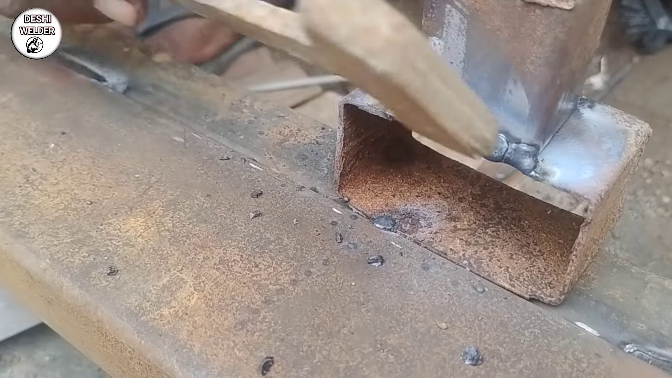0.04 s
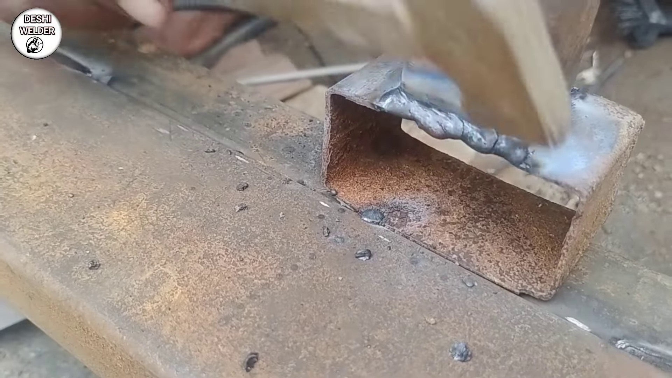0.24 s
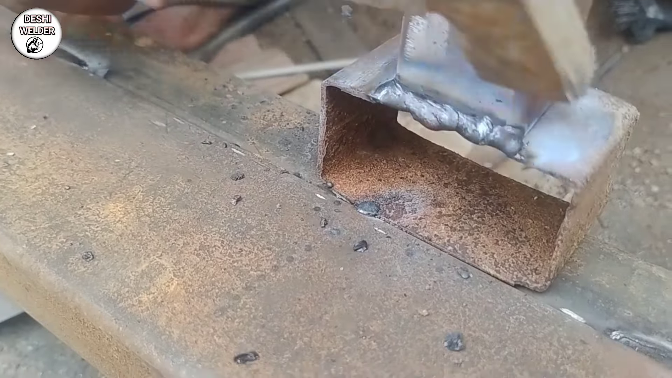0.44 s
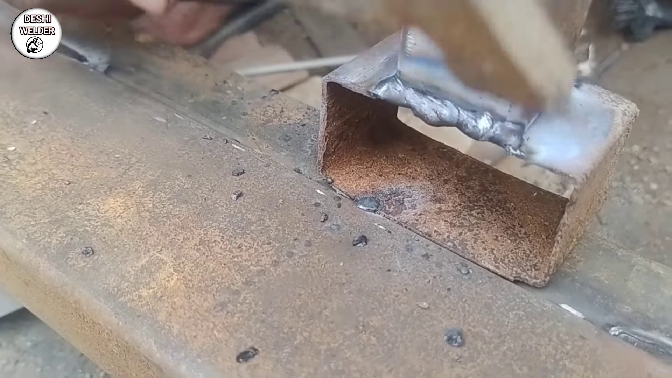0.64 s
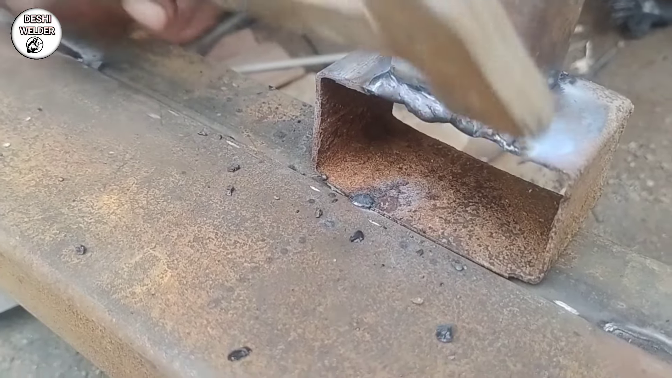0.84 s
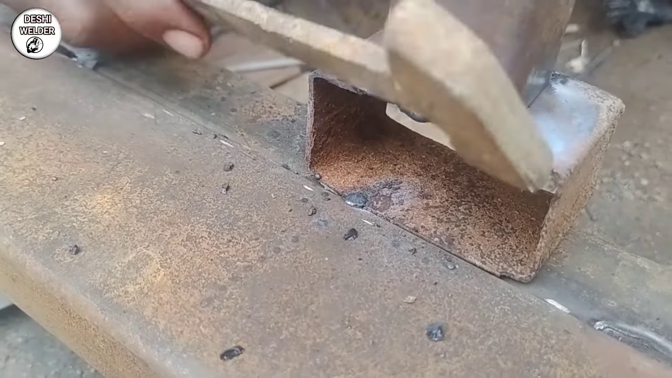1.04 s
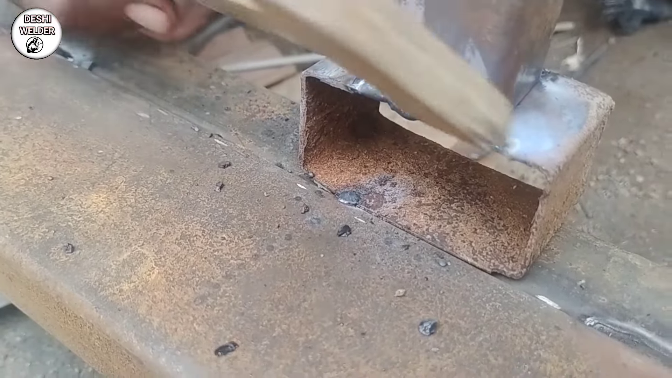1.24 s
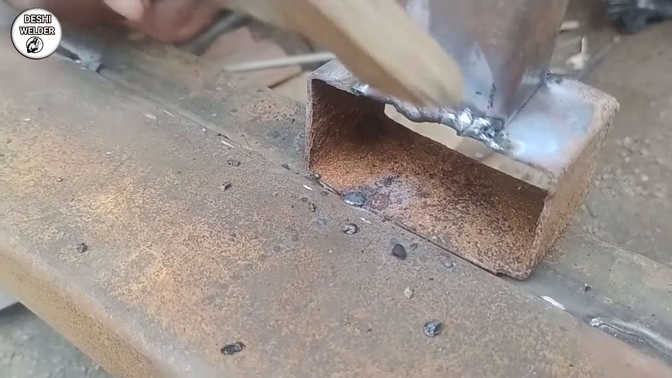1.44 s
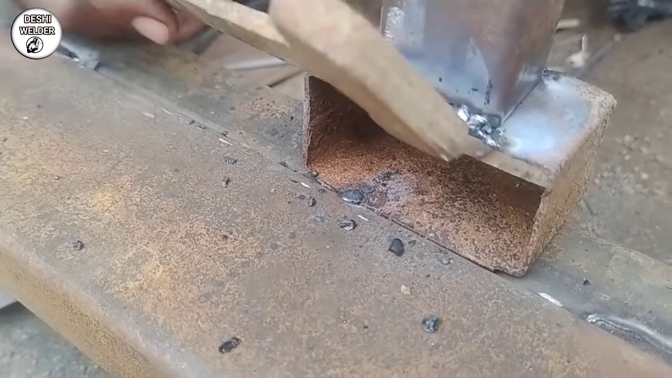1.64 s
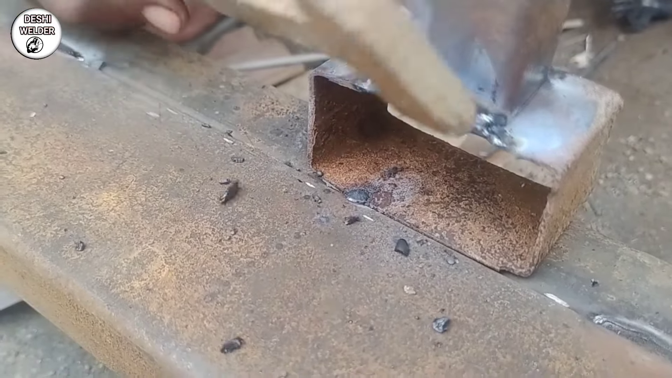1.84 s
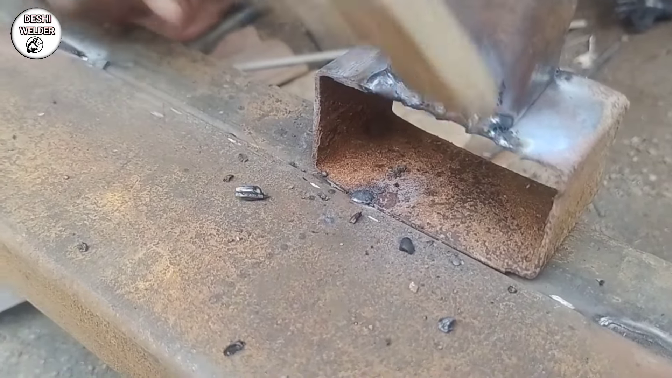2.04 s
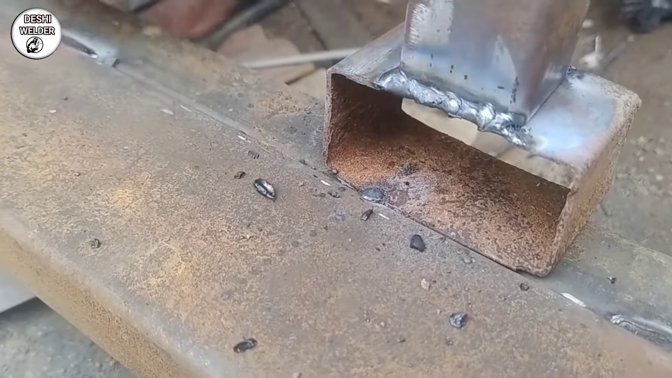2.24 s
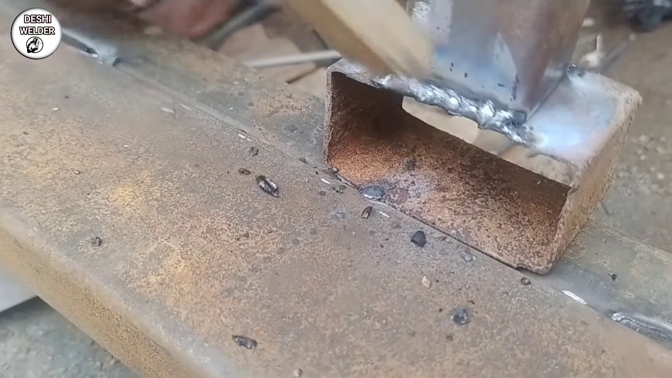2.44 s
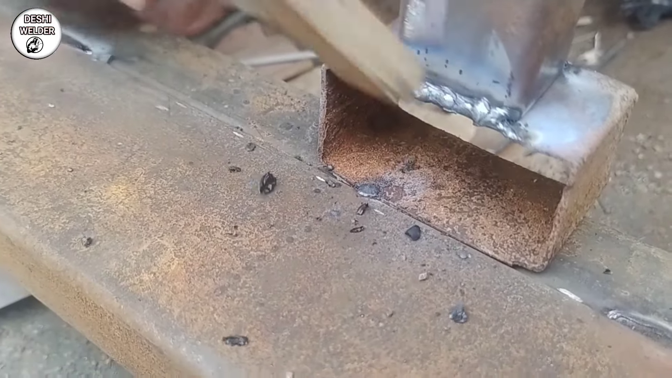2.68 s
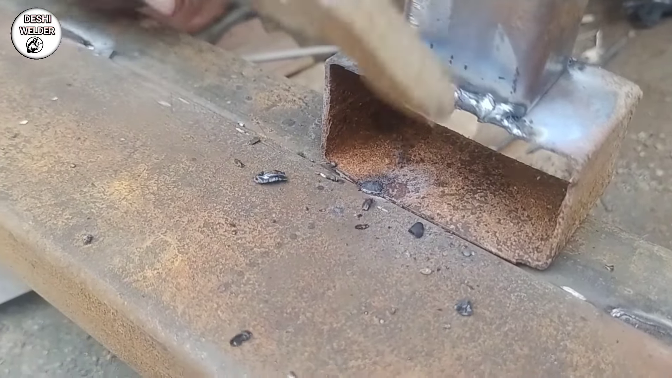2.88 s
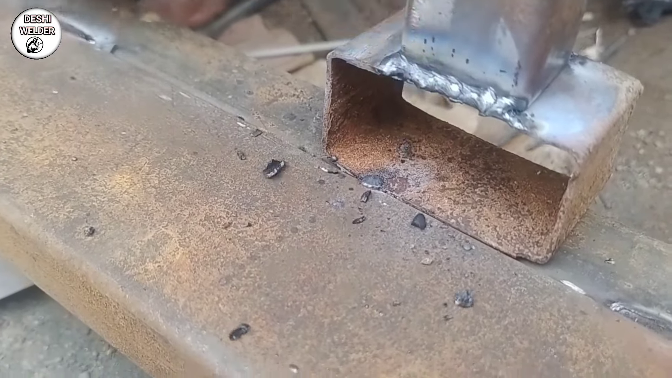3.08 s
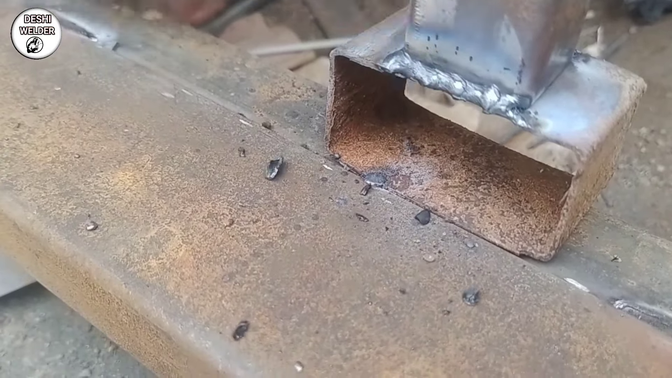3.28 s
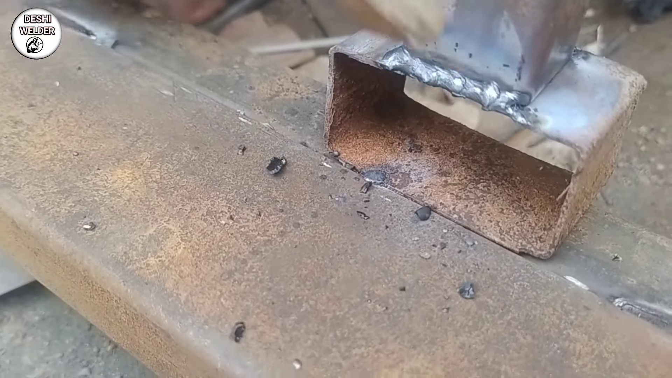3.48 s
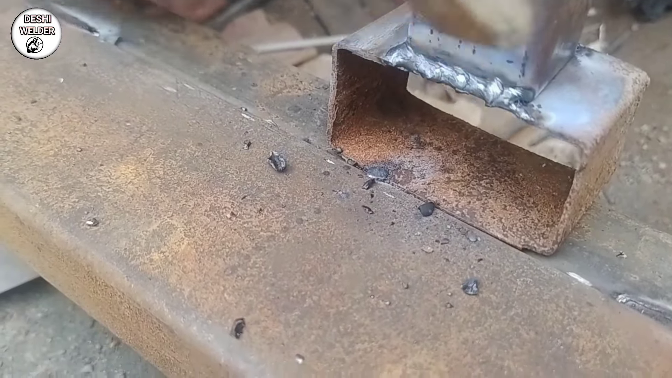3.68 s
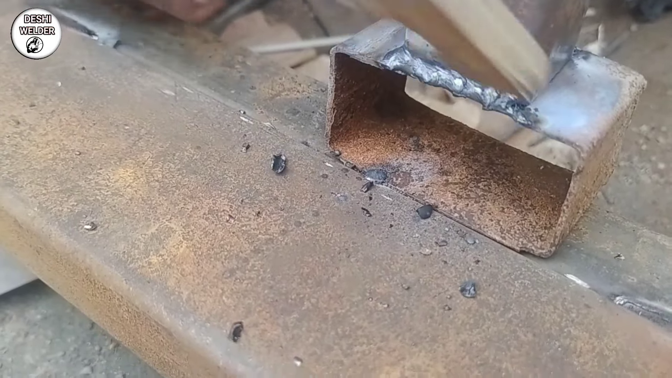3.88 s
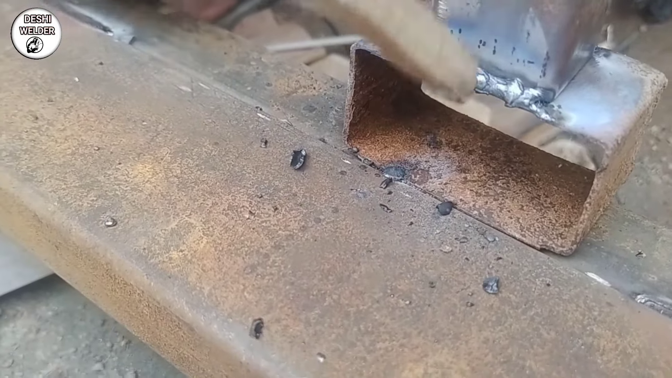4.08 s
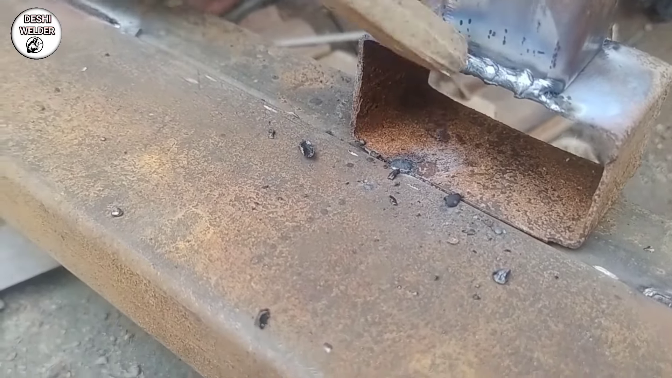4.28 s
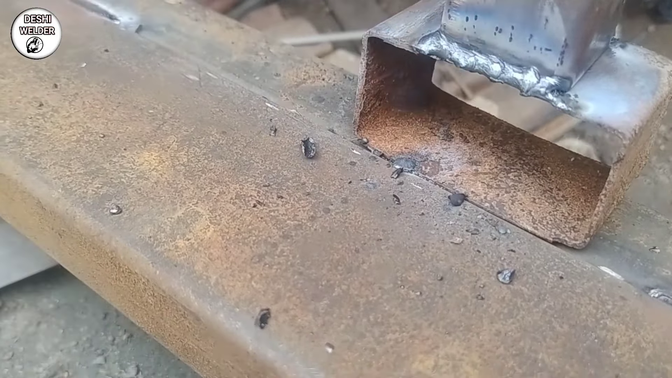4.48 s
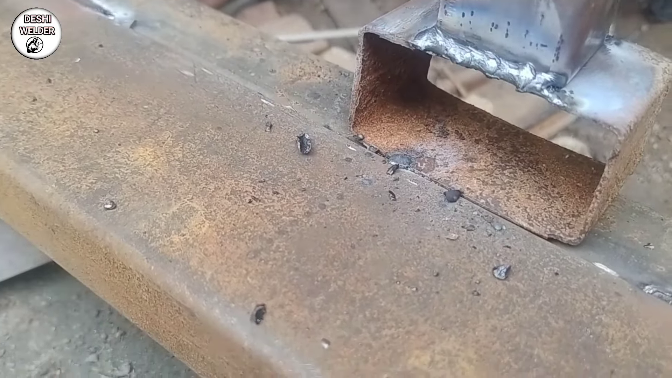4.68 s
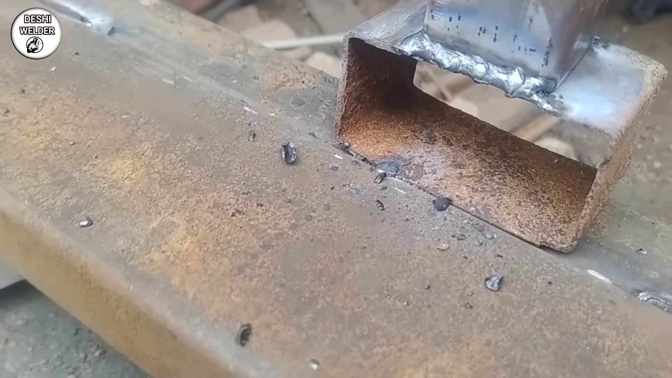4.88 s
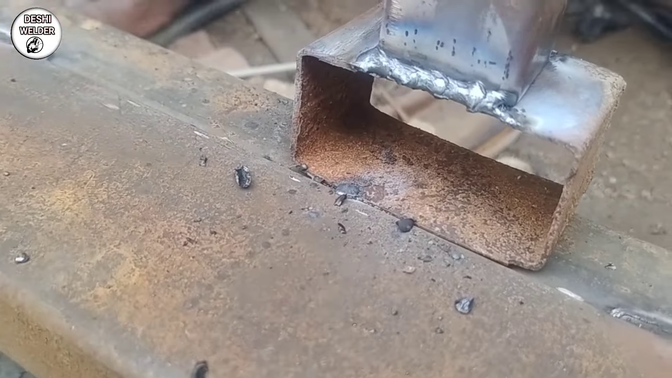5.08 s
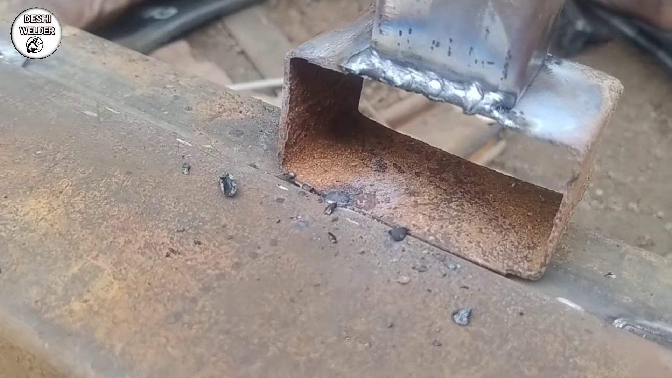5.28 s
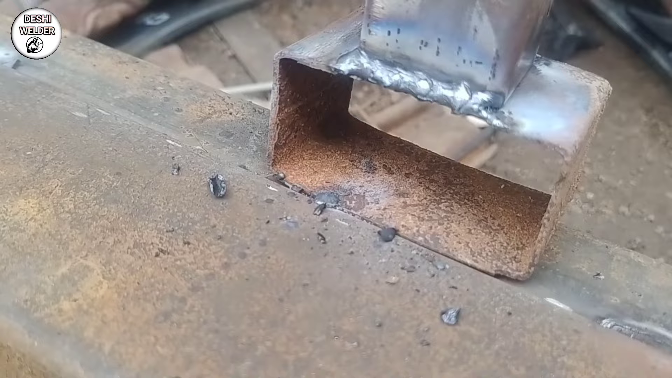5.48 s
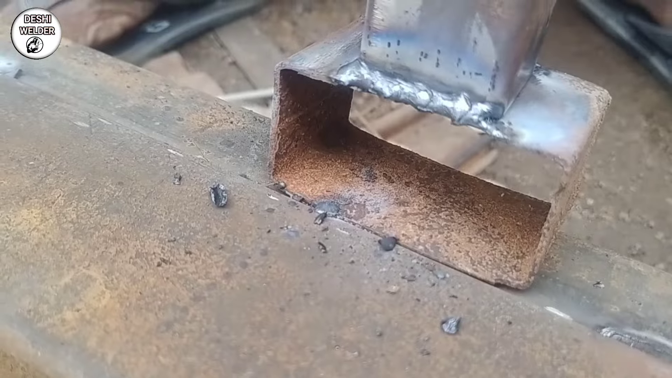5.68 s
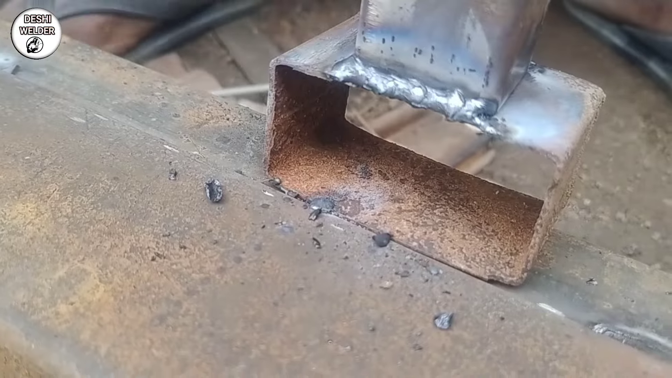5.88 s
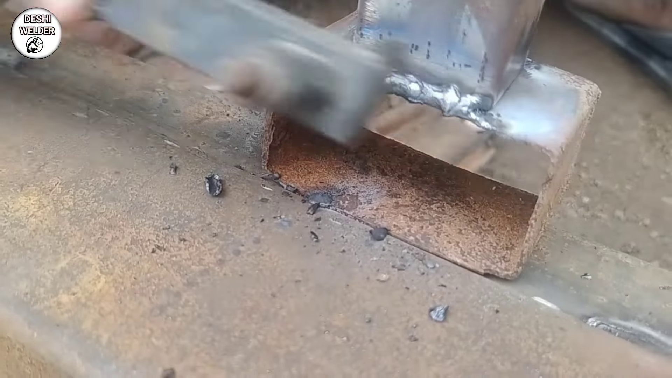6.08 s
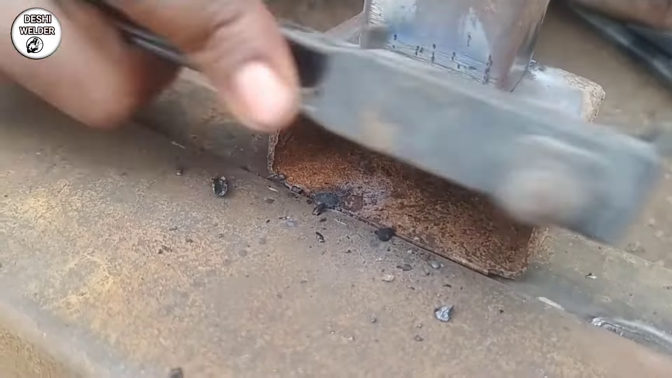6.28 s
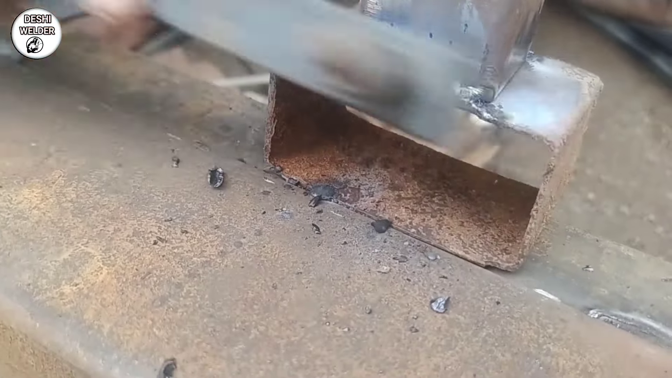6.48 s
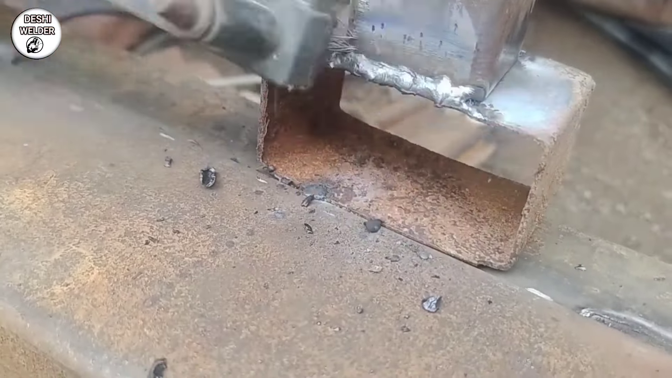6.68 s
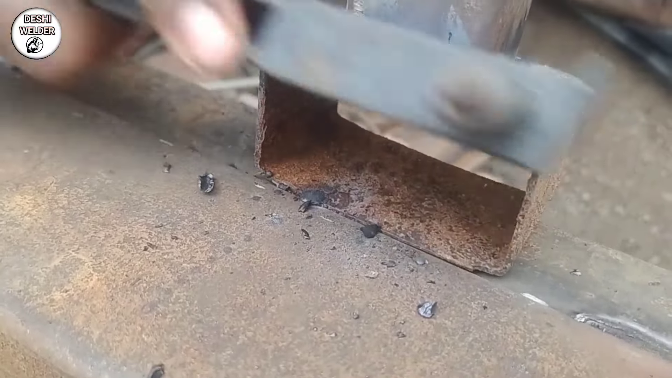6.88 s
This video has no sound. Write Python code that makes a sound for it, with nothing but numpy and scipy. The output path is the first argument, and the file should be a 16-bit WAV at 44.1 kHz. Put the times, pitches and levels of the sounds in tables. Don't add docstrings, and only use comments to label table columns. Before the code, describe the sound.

Outdoor metalwork heard on a close phone microphone: a brief quiet moment, then rapid hard taps on a welded box tube, crisp and hollow with chattering, ringing steel between blows. The tool is laid down with a ringing clank. Soft ticks and scuffs pass in low yard noise with a faint distant motor, before quick raspy wire strokes hiss across the weld to the end.

```python
import sys
import numpy as np
from scipy import signal
from scipy.fft import rfft, irfft, next_fast_len
from scipy.io import wavfile
from scipy.ndimage import uniform_filter1d, minimum_filter1d, map_coordinates

SR = 44100
rng = np.random.default_rng(int(sys.argv[2]) if len(sys.argv) > 2 else 0)


def master(y):
    cut = np.clip(np.atleast_2d(y).T, -1, 1)
    pcm = np.round(cut * 32767)
    wavfile.write(sys.argv[1], SR, pcm.astype(np.int16))


def attenuation_scalar(level_db):
    decades = np.asarray(level_db, float) / 20
    return 10 ** decades


N = 305613
T = np.arange(N) / SR
TOP_HZ = 16800

BLOW_S = [.27, .3853, .4926, .5936, .7018, .8095, .9224, 1.0357, 1.1566, 1.2773, 1.3925, 1.5101, 1.6248,
          1.7449, 1.8594, 1.9707, 2.0759, 2.1766, 2.2844, 2.3989, 2.5165, 2.6342, 2.7515, 2.8701, 2.9907,
          3.1064, 3.2252, 3.3375, 3.4383, 3.5439, 3.6414, 3.738, 3.8294, 3.922, 4.0111, 4.104, 4.1954,
          4.2875, 4.3767]
# crack_peak_db, head_ping_db, tube_clang_db, beam_push_db
BLOWS = [(-15, -56.5, -24.5, -15), (-5.5, -21, -24.5, -4), (-6, -53, -20, -2), (-9.5, -25, -22, 5),
         (-8.5, -31.5, -22, -3), (-12.5, -27, -22.5, 0), (-8, -48.5, -25.5, -1), (-11.5, -41, -22.5, 3),
         (-8.5, -26, -24, -7), (-8.5, -49, -21, -19), (-6.5, -60.5, -24.5, -2), (-6.5, -39, -24, -1),
         (-11.5, -42, -21, -2), (-8, -24, -21, -19), (-9.5, -53, -22, -16), (-6.5, -45.5, -21.5, -3.5),
         (-6.5, -50.5, -26.5, -8), (-11, -26.5, -19.5, -14), (-7.5, -25, -24, -13.5), (-8, -21.5, -23, 7.5),
         (-6.5, -32.5, -25.5, 7.5), (-5.5, -47.5, -25, 1.5), (-6.5, -35.5, -26, 2.5), (-7, -33, -27, 8.5),
         (-6.5, -33, -28, 8), (-6.5, -40, -27.5, -1), (-6.5, -59.5, -26.5, 3.5), (-7.5, -64, -24.5, -2),
         (-12, -31.5, -22.5, -9), (-6, -41.5, -28, 0.5), (-9, -34.5, -24, 2.5), (-10, -23, -24.5, -11),
         (-12, -23, -24.5, -17), (-15.5, -22.5, -23.5, -19), (-11, -22.5, -28.5, 2),
         (-11.5, -28, -21.5, -12), (-10.5, -37, -22, -9), (-5, -38.5, -23, 1), (-7, -38.5, -24.5, -2.5)]
# start_s, crack_peak_db, head_ping_db, tube_clang_db, beam_push_db
STRIKES = np.column_stack([BLOW_S, BLOWS])
GRIP = [-20.0, 31, -120.0, -89, 159, 30.0, -62, 190.0, 60.0, 40.0, -110.0, -60.0, 249, -150.0, -380.0, 81,
        180.0, 10.0, -19, 50.0, 70.0, -230.0, 60.0, 21, 90.0, -350.0, 120.5, 80.0, 30.0, 20.0, 40.0, 89.5,
        -300.0, 110.0, 70.5, 60.0, 0.0, 20.0, 30.0]
# time_s, way_from_thin_wall (0-1), way_onto_flange (0-1)
SPOT = [
    (.4, 0.22, 0.26),
    (1.2, 0.04, 0.06),
    (1.7, 0.16, 0.26),
    (2.7, 0.28, 0.65),
    (3.2, 0.16, 0.43),
    (3.7, 0.23, 0.51),
    (4.15, 0.41, 0.49),
    (4.22, 1, 0.91),
    (4.47, 0.35, 0.78),
]
# start_s, peak_db
REBOUNDS = [(0.2756, -25), (.283, -11.5), (.5003, -21), (0.706, 3.5), (0.8146, 9.5), (1.042, -17.5),
            (1.0545, -16), (1.2872, -30), (1.4035, -33), (1.635, 7), (2.1858, -20.5), (2.2866, -14.5),
            (2.3991, 12), (2.7575, -3), (2.996, -5.5), (3.3444, -22.5), (4.1073, -7), (4.1981, -0.5)]
# pitch_hz, level_db (per Hz)
CRACK = [(180, -46), (300, -35), (1230, -10), (2250, -44), (5050, -21.5), (7430, 6), (8360, -3.5),
         (9560, 7), (11700, 0.5), (14800, -20), (16600, -42)]
HEAD_HZ = [9229, 10004, 12300, 13650, 14940]
# level_db, t60_s
HEAD = [(5, 0.11), (-8, 0.1), (-34, 0.071), (-33.5, .15), (-21.5, .12)]
# pitch_hz, level_db, t60_s
TIP = [(14850, -20.5, .03), (14310, -22.5, 0.042), (15100, -20, .008)]
# pitch_hz, level_db, t60_s
BEAM = [(159, -12, 0.0079), (220, 16, 0.0072), (402, -6, 0.019), (633, -19.5, 0.0064)]
# start_s, peak_db, thud_over_peak_db
LAID = [
    (4.7465, -9, -28.5),
]
FREE_HZ = [2848, 3670, 6277, 6723, 7186, 8349, 9014, 8933, 10595, 11341, 13640, 14937, 10800, 14900, 11900,
           13150]
# level_db, t60_s
FREE = [(-24, 0.25), (-23, 0.045), (-7.5, .4), (-2, 0.29), (-6.5, 0.45), (-22, .1), (-16, 0.17),
        (-11.5, 0.16), (1.5, .18), (-20, .5), (-22.5, 0.65), (-5.5, 0.17), (10, 0.0127), (8, .03),
        (-3.5, 0.036), (-25, .2)]
TUBE_HZ = [170, 262, 378, 636, 733, 858, 894, 926, 947, 1141, 1345, 1474, 1569, 1723, 1803, 1948, 1990,
           2092, 2123, 2254, 2389, 2480, 2744, 2930, 3252, 4673, 5398, 5710, 7590, 7715]
# level_db, t60_s
TUBE_RING = [(-2, 0.13), (-6, 0.4), (-10, 0.35), (-23, 0.65), (-11, 0.86), (-15, 0.3), (-14, 1),
             (-16, 0.41), (-14.5, 0.72), (-22.5, 0.41), (-26, 0.84), (-4, 0.57), (-29.5, 0.78),
             (-18.5, 0.26), (-14, 0.48), (1.5, 0.36), (-6.5, 0.31), (-10.5, 0.57), (-7.5, 0.93), (2, 0.28),
             (-3.5, 0.33), (-5, 0.59), (-6, 1), (-9.5, 0.43), (-23.5, 0.99), (-10.5, 0.24), (-17.5, 0.043),
             (-12, 0.031), (-14, 0.13), (-10.5, 0.12)]
TUBE_PAN = [2, -2, 0, -6, 2, -2, 2, 2.5, 9.5, 0.5, 0.5, 5.5, 1.5, 1, 2.5, 11, -8, -15, 9, -2, 11.5, 10.5, 2,
            3, 23, 9, -1, -6, -8, -4]
# pitch_hz, level_db (per Hz)
DENSE = [(53, -65), (90, -25), (173, 3.5), (538, -30.5), (869, -16), (1030, -16), (1950, -4), (3910, -19.5),
         (6750, -19), (7690, -13.5), (8770, -22.5), (10700, -18), (13600, -24), (15100, -23.5),
         (16500, -54)]
# pitch_hz, level_db, t60_s, left_minus_right_db
MORE_TUBE_MODES = [(1508, -11.5, 0.1, 14), (1830, -23, 0.15, 2), (1814, -7.5, 0.26, 18.5), (1742, -6, 0.23, -5),
                   (2256, -6.5, 0.44, 23), (2297, 0.5, 0.33, -0.5), (2540, -7.5, 0.22, 4), (2670, -3, .3, 1),
                   (2581, -28, .3, 1.5), (2680, -13, 0.2, -11), (6490, -9, 0.045, -23), (7920, -10.5, 0.052, -4.5)]
# pitch_hz, level_db, t60_s
LINGER = [(1180, -43, 0.35), (1450, -43, .65), (1465, -33, 0.31), (2020, -43, 0.46)]
# low_hz, high_hz
PART_HZ = [(110, 420), (550, 800), (800, 1150), (1150, 1640), (1640, 3400), (3560, TOP_HZ)]
# beam_db, belly_db, wall_db, flange_db, high_db
FAVOURS = [(1.0, 9.0, 4, 1, -2), (0.5, 2, 2, -5, 0.5), (-2.5, 0, -0.5, 1, -3), (4.5, 0.5, 0.5, 6.5, -1.0),
           (-0.5, -3.5, -0.5, -1.5, -6.5), (3.5, -6, 6.0, -2.5, -2), (-5, 2.5, 0, 2.5, 1.5),
           (4, -6, 5, -2, -2), (5.5, 2.5, -8, -3.5, -2), (-3.5, 2, -3, -1.5, -2.0),
           (-3.5, 3, -3.5, -4.0, -1), (0.5, 2, 2.5, -6, 1), (-1.5, 0.5, -6.5, -4, -4),
           (-2.5, -1, -10.5, -11.5, -6), (3.5, 0.5, -5.5, 19, -2.5), (0, 6.5, -8, 4, -2.5),
           (3, 4, 8, 6, 2.5), (0, 3, -14, -10, -4.5), (-2.5, 6.5, -12, -7, -0.5), (0.5, -4, -3, -5, -3.5),
           (2, 6, -11, 10.5, 1), (2, 4.5, -3.5, 3.5, 1.5), (7, 3.5, -1.5, 4, 3), (5, 3, -2.5, 5, 4),
           (8, 6, 1, 9, 2.5), (2, -0.5, -4, 15, 2.5), (4, -1.5, 2.5, 5.5, 1.5), (8.5, -7.5, -1, 12, 1.5),
           (5.5, -7, 1, -3.5, -0.5), (1, 4, 2.5, 6, 2), (2.5, 0, 4.5, 1.5, 0), (-0.5, 6, -16, 5.5, -0.5),
           (1, 1.5, 3, -14, -2.5), (-0.5, -2, -1, -13.5, -5.5), (9, -7, -1.5, 3, 0),
           (1.0, -13, 0, -7, -3.5), (6, -11, -3, -2, 0), (3, -3, -2, -1, -1), (2.5, 2.0, 1, 0.5, 1)]
# pitch_hz, level_db (per Hz)
BRISTLE = [(1100, -59), (1500, -1), (2500, -1.5), (3050, 1), (3300, -14.5), (3950, -8), (4200, -4.5),
           (4500, -4), (5100, -9.5), (5700, -2.5), (7000, -10), (9000, -5), (12500, 0.2), (15600, -6),
           (15900, -55.5)]
# pitch_hz, width_hz, level_db
SCRUBBED = [(7540, 480, 7), (9540, 62, -4.5)]
# time_s, hiss_db
PRESSURE = [
    (6.11, -59.5),
    (6.124, -47.5),
    (6.264, -41.5),
    (6.35, -42),
    (6.364, -40),
    (6.712, -39),
    (6.728, -41),
    (6.746, -37),
    (6.92, -40),
]
# time_s, dip_db
TURNS = [(6.172, -8), (6.232, -10), (6.292, -6), (6.348, -7), (6.462, -5), (6.53, -3), (6.585, -7),
         (6.642, -7), (6.702, -6), (6.757, -5), (6.82, -6), (6.88, -6)]
# start_s, peak_db
SNAPS = [(6.1256, -31), (6.1817, -28), (6.2367, -36), (6.3268, -30), (6.364, -30), (6.363, -28),
         (6.4843, -34), (6.5976, -19.5), (6.651, -27), (6.8316, -31), (6.8875, -27)]
# start_s, peak_db, knock_db, t60_s, knock_hz
TICKS = [
    (4.6079, -71, -70.5, 0.016, 1500),
    (5.2808, -59, -58.5, 0.023, 3000),
    (5.5453, -56, -61.5, 0.028, 3000),
    (5.8047, -50, -69, 0.02, 1995),
    (5.903, -62, -44, 0.015, 1600),
    (5.9075, -62, -42.5, 0.091, 600),
    (5.9801, -60, -41, 0.0057, 4690),
    (5.908, -60, -51, 0.028, 5500),
]
# time_s, half_length_s, level_db
SCUFFS = [
    (5.288, .035, -65.5),
    (5.565, .02, -56.5),
    (5.63, 0.0032, -60),
    (5.806, .002, -54),
    (5.915, 0.01, -54),
]
# start_s, level_db, sign
PUSHES = [
    (5.9034, -30, -1.06),
    (5.9076, -32, 1),
]
# pitch_hz, level_db (per Hz)
YARD = [(15, -67), (25, -57), (146, 0.5), (358, -5.5), (389, -9), (496, -9.5), (568, -15), (878, -9),
        (1030, -19), (1120, -16.5), (2150, -20), (15200, -34.5), (15500, -60)]
# pitch_hz, likeness
YARD_ALIKE = [(60, 0.92), (240, 1), (950, 0.6), (3770, -0.05), (15000, 0.081)]
# from_s, to_s
LOUD_S = [
    (.3, 4.53),
    (4.796, 4.911),
    (6.13, 7),
]
# lift_at_start_db, lift_at_end_db, dip_afterwards_db
LOUD = [
    (0, -4.5, -16),
    (6, 2.5, -4.5),
    (8.5, 8.5, 0),
]
# pitch_hz, likeness
ALIKE = [(60, 0.45), (130, 0.91), (290, 0.72), (640, 0.92), (1410, 0.95), (3100, -0.57), (6820, 0.11),
         (15000, -0.59)]
# pitch_hz, lead_rad
LEAD = [(0, 0.5), (1460, 0.61), (1890, 2), (2410, -3.5), (3270, -1.46), (5430, -3.5), (6290, -15.5),
        (6980, -14), (8960, -11), (9220, -11.5), (10200, -6.5), (13400, 4), (15200, -7), (16400, -12.5)]
# pitch_hz, left_minus_right_db
LEAN = [(60, -3), (300, -1.5), (700, -1), (1300, 0), (2300, -1.2), (3500, -2), (5000, -2), (6500, -2),
        (7600, -11), (9200, 2.5), (11000, 0), (15000, -3)]
# pitch_hz, threshold_db
MASKED = [(3000, -40), (3500, -14), (5200, -14), (6000, -22), (8800, -17), (11000, -16), (12500, -12),
          (13400, -8), (14000, -13), (15200, -13), (15600, -4)]
# pitch_hz, threshold_db
SHADED = [(2900, -40), (3150, -4), (4100, -2.5), (4300, -5), (4700, -3.5), (5300, -4), (5600, -8),
          (6200, -10), (7000, -40)]

THUD_DB, THUD_PER_PING, THUD_FLANGE_DB, THUD_AWAY_DB = -39, -0.35, 13, -12.5
EDGE_HZ, EDGE_DB, EDGE_T60 = 7550, -5, 0.004
FIRST_TOUCH, PING_LIFT_DB = 9, 4
BUMP_S, BUMP_DB = 6.722, -29.5
WALL_DB, WALL_SPAN_DB, FLANGE_DB, FLANGE_SPAN_DB = -0.5, -48, -32.5, 41
HIGH_DB, SHIFT_DB = -5, -10.5
CLANG_RISE_S, CLANG_LAG_DB = .01, -4.5
STEADY_HZ = 1670
STOP_S, STOP_DB_PER_S, FLANGE_STOP_DB_PER_S = 4.444, 106, 60
RECOVERY_DB, RECOVERY_PER_DB, RECOVERY_PER_S = 5.5, 1.09, 36
AHEAD_DB, AHEAD_HIGH_DB, AHEAD_S = -2.5, -6, .004
DUCK_LOW_DB = -4.5
BRUSH_S, BRISTLE_RISE_S, RUNG_RISE_S, HUM_RISE_S = 6.108, 0.015, 0.1, 0.027
YARD_DB, MOTOR_DB, MOTOR_HZ, SETTLE_S = -54, -55.5, 860, 0.19
SHAKE_DB, SHAKE_HZ, SHAKE_S = -44, 160, .03
CEILING, LOOK_S = .5, .0003
FRAME_LEAD = 468


def hammer():
    out = np.zeros((2, N))
    hammer_blows(out)
    for s, db in REBOUNDS:
        add(out, s - .001, attenuation_scalar(db - 4) * crack(.014, snap=.4))
    hammer_laid_down(out)
    add(out, BUMP_S, attenuation_scalar(BUMP_DB) * ring(np.column_stack([HEAD_HZ, HEAD]), 0.71)[0])
    add(out, STOP_S, ring(LINGER, 0)[0] * (1 - np.exp(-T[:SR // 2] / .02)))
    return out


def hammer_blows(out):
    age, spots = T[:SR // 2], curves(SPOT)
    pings = ring(np.column_stack([HEAD_HZ, HEAD]), 0.71, count=len(STRIKES))
    thuds = ring(BEAM, 0)[0]
    edge = ring([(EDGE_HZ, EDGE_DB, EDGE_T60)] + TIP, 0)[0]
    let_go_db = PING_LIFT_DB * np.clip((age - .048) / 0.011, 0, 1)
    for (s, db, ping_db, _, push_db), ping, grip in zip(STRIKES, pings, GRIP):
        away, across = (spot[round(s * SR)] for spot in spots)
        thud_db = THUD_DB + THUD_PER_PING * (ping_db + 39.0) + push_db
        thud_db = thud_db + THUD_FLANGE_DB * across + THUD_AWAY_DB * away
        lean = attenuation_scalar(4.6 * rng.standard_normal() * np.array([[1], [-1]]))
        push = attenuation_scalar(db + thud_db + 14.5) * (pulse(0.00013) + pulse(0.00015))
        add(out, s - .001, attenuation_scalar(db - 2.5) * crack(0.032, snap=0.3) + push)
        held_db = ping_db + 0.5 + grip * np.minimum(age, .06) + let_go_db
        add(out, s, attenuation_scalar(held_db) * ping + attenuation_scalar(db) * edge + attenuation_scalar(db + thud_db) * lean * thuds)
        add(out, s, attenuation_scalar(db + thud_db + 11.0) * pulse(0.00043) / lean)


def hammer_laid_down(out):
    age, thuds = T[:SR // 2], ring(BEAM, 0)[0]
    for s, db, thud_db in LAID:
        gain_db = 6 * np.clip((age - .05) / 0.001, 0, 1) - 7 * np.clip((age - .165) / 0.0035, 0, 1)
        buzz = attenuation_scalar(-17.5 - 60 * age / .4) * filtered(rng.standard_normal(len(age)), band(2300, 6200))
        free = ring(np.column_stack([FREE_HZ, FREE]), 0)[0]
        add(out, s - .001, attenuation_scalar(db - 20.5) * crack(.005, snap=1.9) + attenuation_scalar(db + thud_db + 6.0) * pulse(0.00018))
        add(out, s, attenuation_scalar(db - 17.0 + gain_db) * (free + buzz) + attenuation_scalar(db + thud_db) * thuds)


def crack(t60, snap):
    t = T[:SR // 8]
    grain = attenuation_scalar(4 * rng.standard_normal(len(t) // 8 + 1).repeat(8)[:len(t)])
    decay = 1.2 * attenuation_scalar(-60 * t / .002) + attenuation_scalar(-180 * t / t60) + .4 * attenuation_scalar(-45 * t / t60)
    burst = rng.standard_normal(len(t)) * grain * decay * (1 - np.exp(-t / .00015))
    burst[6] = FIRST_TOUCH
    burst = filtered(np.roll(burst, 40), lambda hz: attenuation_scalar(along(CRACK, hz)))
    burst = burst * np.clip((t - .0007) / .0003, 0, 1)
    return burst / abs(burst).max() + snap * pulse(.00006)


def pulse(width):
    u = (T[:SR // 8] - .0013) / width
    return -(1 - u ** 2) * np.exp(-u ** 2 / 2)


def ring(modes, scatter_db, count=1, pan_db=None):
    t = T[:SR // 2]
    hz, db, t60 = np.transpose(modes)[..., None]
    luck = rng.standard_normal((count, 2, len(modes)))
    flip = np.where((scatter_db > 0) & (luck[:, 1] < -1.1), -1, 1)
    sign = flip * (-1) ** np.arange(len(modes))
    strength = sign * attenuation_scalar(scatter_db * np.minimum(hz.T / STEADY_HZ, 1) * luck[:, 0])
    if pan_db is not None:
        strength = strength[:, None] * attenuation_scalar(np.outer([.5, -.5], pan_db))
    return strength @ (attenuation_scalar(db - 60 * t / t60) * np.sin(2 * np.pi * hz * t))


def clang():
    s, crack_db, _, clang_db, _ = np.transpose(STRIKES)
    pause = np.diff(s, append=2 * s[-1] - s[-2])
    recovery_db = RECOVERY_DB + RECOVERY_PER_DB * (crack_db - crack_db.mean())
    recovery_db = recovery_db + RECOVERY_PER_S * (pause - pause.mean())
    last = np.maximum(np.searchsorted(s, T) - 1, 0)
    age = T - s[last]
    released = np.clip((age - .048) / 0.017, 0, 1)
    ahead = np.exp(-abs(np.append(s[1:], 2 * T[-1])[last] - T) / AHEAD_S)
    level_db = clang_db[last] - 7.0 - 90 * age + recovery_db[last] * released + AHEAD_DB * ahead

    away, across = curves(SPOT)
    stopped = np.maximum(T - STOP_S, 0)
    damping_db = SHIFT_DB * across ** 4 - STOP_DB_PER_S * stopped
    low_db = WALL_DB + WALL_SPAN_DB * away
    flange_db = FLANGE_DB + FLANGE_SPAN_DB * across
    flange_db = flange_db + (STOP_DB_PER_S - FLANGE_STOP_DB_PER_S) * stopped

    sound = tube_rattle(s) + attenuation_scalar(-5) * tube_strikes(s)
    parts = filtered(sound, lambda hz: np.array([[band(*edges)(hz)] for edges in PART_HZ]))
    beam, belly, wall, flange, main, high = map(unit, parts)
    favour = attenuation_scalar(uniform_filter1d(np.transpose(FAVOURS)[:, last], size=90))[:, None]
    beam, belly, wall, flange, high = favour * [beam, belly, wall, flange, high]
    main = main * attenuation_scalar(CLANG_LAG_DB * np.exp(-np.abs(age) / CLANG_RISE_S))
    early = attenuation_scalar(9.3 * np.exp(-np.abs(age) / 0.057) + AHEAD_HIGH_DB * ahead)
    ducked = attenuation_scalar(DUCK_LOW_DB * (1.5 - released))
    mix = attenuation_scalar(low_db) * ducked * wall + attenuation_scalar(flange_db) * flange + main
    mix = mix + ducked * (attenuation_scalar(-13.0) * beam + attenuation_scalar(-3.0 + 0.96 * low_db) * belly)
    mix = mix + attenuation_scalar(HIGH_DB) * early * high
    return (age > 0) * attenuation_scalar(level_db + damping_db) * mix


def tube_strikes(moments):
    struck = np.zeros((2, N))
    modes = np.vstack([np.column_stack([TUBE_HZ, TUBE_RING, TUBE_PAN]), MORE_TUBE_MODES])
    strikes = ring(modes[:, :3], 3.7, count=len(moments), pan_db=modes[:, 3])
    for at, strike in zip(moments, strikes):
        add(struck, at, strike)
    return struck


def tube_rattle(moments):
    force = spread(chatter(grain_db=1.8, rate=260), ALIKE)
    return unit(tube(patchy(force, depth_db=4, moments=moments), sharp_db=3))


def tube(force, sharp_db):
    modes = [(hz, np.log(1000) / (np.pi * t60), db + sharp_db) for hz, (db, t60) in zip(TUBE_HZ, TUBE_RING)]
    sharp = resonances(modes)
    return filtered(force, lambda f: sharp(f) + attenuation_scalar(along(DENSE, f)))


def chatter(grain_db, rate):
    return rng.standard_normal((2, N)) * attenuation_scalar(grain_db * wobble(rate))


def patchy(x, depth_db, moments):
    hz, t, z = signal.stft(x, SR, nperseg=512)
    field = uniform_filter1d(rng.standard_normal((len(moments) + 1, z.shape[1])), size=2, axis=1)
    strength = unit(field)[np.searchsorted(moments, t)].T
    gain = attenuation_scalar(depth_db * np.minimum(hz / STEADY_HZ, 1)[:, None] * strength)
    return signal.istft(z * gain, SR, nperseg=512)[1][:, :N]


def brush():
    rise = lambda tau: 1 - np.exp(-np.maximum(T - BRUSH_S, 0) / tau)
    colour = lambda hz: attenuation_scalar(along(BRISTLE, hz)) * (1 + resonances(SCRUBBED)(hz))
    flicks = spread(chatter(grain_db=2.5, rate=350), ALIKE)
    hiss = unit(filtered(patchy(flicks, depth_db=2.2, moments=np.transpose(TURNS)[0]), colour))
    rung = tube(spread(chatter(grain_db=6.5, rate=300), ALIKE), sharp_db=10.5)
    rung = unit(filtered(rung, band(1300, 3800)))
    hum = unit(filtered(chatter(grain_db=1, rate=30), resonances([(290, 160, -9)])))
    hum_phase = 2 * np.pi * np.cumsum(148 + 2.48 * wobble(6)) / SR
    hum = hum + attenuation_scalar(15 + 2.0 * wobble(8)) * np.sin(hum_phase)
    pause_db = sum(dip_db * np.exp(-((T - s) / np.where(T < s, .016, .006)) ** 2) for s, dip_db in TURNS)
    mix = attenuation_scalar(pause_db + curves(PRESSURE)[0] + 5.5) * rise(BRISTLE_RISE_S) * hiss
    mix = mix + attenuation_scalar(-41.0) * rise(RUNG_RISE_S) * rung
    for s, db in SNAPS:
        add(mix, s - .001, attenuation_scalar(db - 6.5) * crack(0.069, snap=0))
    return mix + attenuation_scalar(-49.5) * rise(HUM_RISE_S) * unit(spread(hum, ALIKE))


def handling():
    out, thuds = np.zeros((2, N)), ring(BEAM, 0)[0][:SR // 8]
    for s, db, knock_db, t60, hz in TICKS:
        burst = rng.standard_normal(SR // 8) * attenuation_scalar(-60 * T[:SR // 8] / t60)
        knock = filtered(burst, resonances([(hz, 0.5 * hz, 0)]))
        thud = attenuation_scalar(knock_db - 2.5) * (900 / hz) ** 2 * thuds
        add(out, s - .001, attenuation_scalar(db) * crack(t60, snap=2.5) + attenuation_scalar(knock_db + 15.0) * knock + thud)
    for s, db, sign in PUSHES:
        add(out, s - .0013, sign * attenuation_scalar(db) * pulse(0.00017))
    rub = sum(attenuation_scalar(db) * np.exp(-((T - s) / half) ** 2) for s, half, db in SCUFFS)
    return out + rub * unit(filtered(chatter(grain_db=2.5, rate=380), band(3800, 15000)))


def yard():
    gain_db = np.zeros(N)
    for (a, b), (*lift_db, dip_db) in zip(LOUD_S, LOUD):
        gain_db += np.interp(T, (a, b), lift_db, 0, 0)
        gain_db += dip_db * (T > b) * np.exp(-abs(T - b) / SETTLE_S)
    noise = spread(rng.standard_normal((2, N)), YARD_ALIKE)
    noise = unit(filtered(noise, lambda hz: attenuation_scalar(along(YARD, hz))))
    whine = np.sin(2 * np.pi * np.cumsum(MOTOR_HZ + 2.81 * wobble(9.0)) / SR)
    return attenuation_scalar(gain_db) * (attenuation_scalar(YARD_DB + 0.9 * wobble(5)) * noise + attenuation_scalar(MOTOR_DB + 2.5 * wobble(12)) * whine)


def unit(x):
    return x / np.sqrt(np.mean(x ** 2) + 1e-20)


def along(points, hz):
    f, v = np.transpose(points)
    return np.interp(np.log(hz + 1), np.log(f + 1), v)


def curves(rows):
    s, *cols = np.transpose(rows)
    return [np.interp(T, s, c) for c in cols]


def wobble(rate):
    knots = rng.standard_normal(int(N * rate / SR) + 4)
    return map_coordinates(knots, [T[::16] * rate]).repeat(16)[:N]


def filtered(x, response):
    m = next_fast_len(x.shape[-1] + 8192, True)
    return irfft(rfft(x, m) * response(np.fft.rfftfreq(m, 1 / SR)), m)[..., :x.shape[-1]]


def band(lo_hz, hi_hz):
    return lambda hz: 1 / np.sqrt((1 + (lo_hz / (hz + 1)) ** 8) * (1 + (hz / hi_hz) ** 8))


def resonances(modes):
    return lambda f: sum(attenuation_scalar(db) * 1j * f * w / (c * c - f * f + 1j * f * w) for c, w, db in modes)


def add(track, s, sound):
    part = track[..., round(s * SR):][..., :sound.shape[-1]]
    part += sound[..., :part.shape[-1]]


def spread(pair, alike):
    turn = lambda hz: np.arccos(np.clip(along(alike, hz), -1, 1)) / 2
    mid, side = filtered(pair, lambda hz: np.array([np.cos(turn(hz)), np.sin(turn(hz))]))
    return np.array([mid + side, mid - side])


def ports(stereo):
    side = np.array([[.5], [-.5]])
    level = lambda hz: attenuation_scalar(side * along(LEAN, hz))
    phase = lambda hz: np.exp(1j * side * np.interp(hz, *np.transpose(LEAD)))
    return filtered(stereo, lambda hz: level(hz) * phase(hz))


def limited(x):
    size = round(LOOK_S * SR)
    need = np.minimum(CEILING / (abs(x).max(0) + 1e-9), 1)
    return x * uniform_filter1d(minimum_filter1d(need, size=2 * size + 1), size=size)


def thinned(x, size=2048, count=16):
    early = np.pad(x, ((0, 0), (FRAME_LEAD, 0)))
    hz, _, z = signal.stft(early, SR, window="cosine", nperseg=size)
    hz, power = hz[:-1], (abs(z[:, :-1]) ** 2).mean(0)
    bands = np.repeat(power.reshape(-1, count, power.shape[1]).mean(1), count, 0)
    mean = bands.mean(0)
    treble = np.median(bands[(hz > 5500) & (hz < 15000)], 0)
    under_mean = attenuation_scalar(2 * along(MASKED, hz))[:, None] * mean
    under_treble = attenuation_scalar(2 * along(SHADED, hz))[:, None] * treble
    limit = np.maximum(under_mean, under_treble)
    luck = uniform_filter1d(rng.standard_normal((len(hz) // count, len(treble))), 2)
    limit = limit * np.repeat(attenuation_scalar(7 * luck), count, 0)
    top = bands[hz > 9500].mean(0)
    steady = (treble < 3.5 * np.roll(treble, 1)) & (top < 6 * np.roll(top, 1))
    limit = limit * (mean > attenuation_scalar(-144)) * steady
    z[:, :-1] *= (bands > limit) | (power > 5.5 * limit)
    return signal.istft(z, SR, window="cosine", nperseg=size)[1][:, FRAME_LEAD:][:, :N]


def scene():
    return ports(clang() + hammer() + brush()) + handling() + yard()


def band_limit(x):
    return signal.sosfilt(signal.butter(12, 16800, fs=SR, output="sos"), x)


def record(dry):
    loudness = np.sqrt(abs(uniform_filter1d(dry ** 2, round(SHAKE_S * SR))))
    air = unit(filtered(rng.standard_normal((2, N)), lambda hz: 1 / (1 + (hz / SHAKE_HZ) ** 2)))
    air = (attenuation_scalar(-85) + attenuation_scalar(SHAKE_DB) * loudness) * air
    heard = filtered(dry, lambda hz: (hz < TOP_HZ) * (1j * hz / (110 + 1j * hz)) ** 2)
    mix = thinned(limited(heard + air))
    return band_limit(mix)


dry = scene()
out = record(dry)
master(out)
```